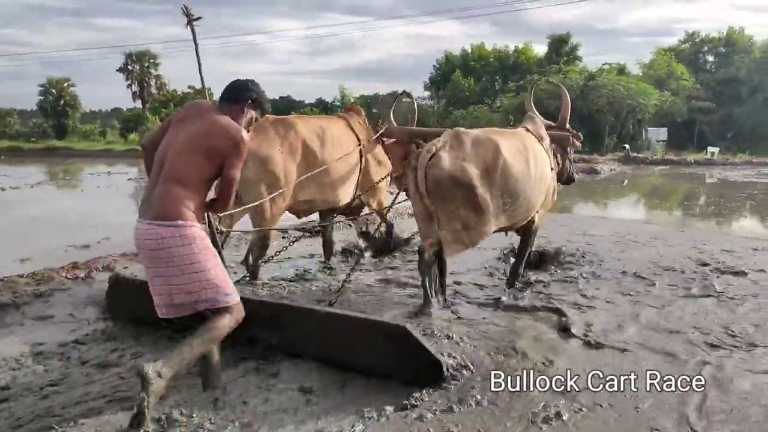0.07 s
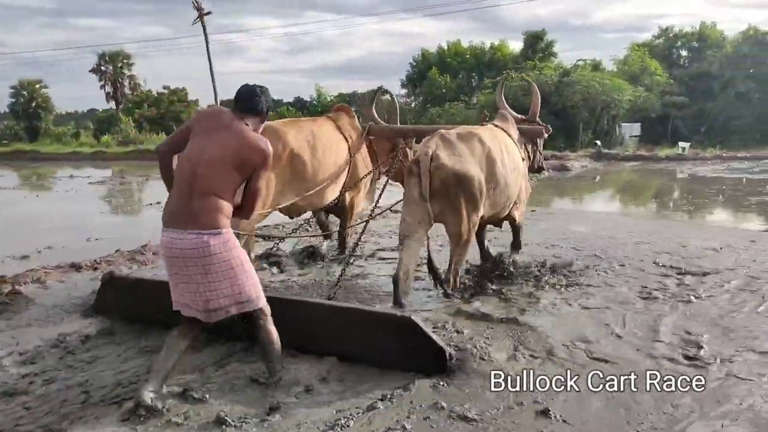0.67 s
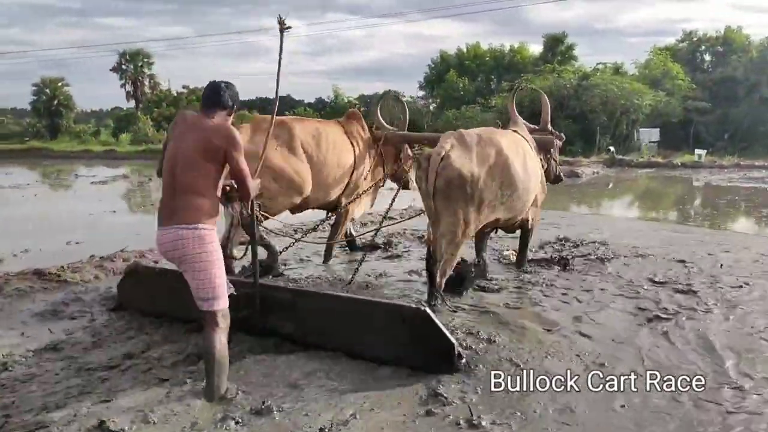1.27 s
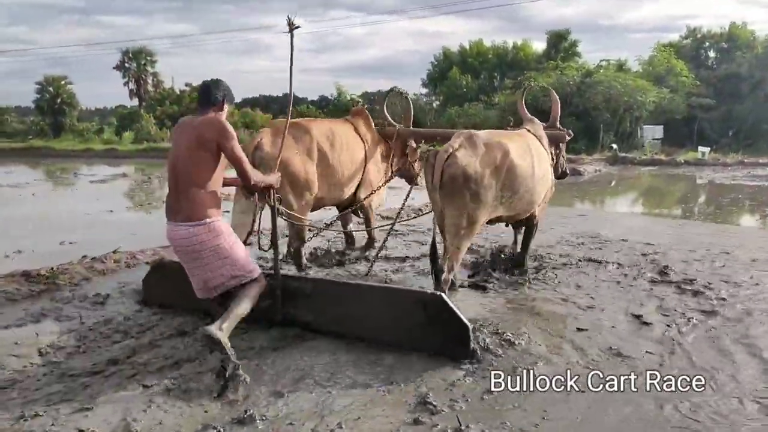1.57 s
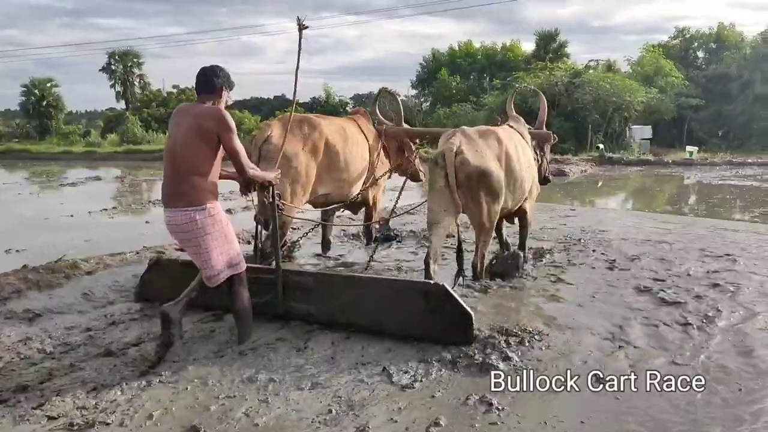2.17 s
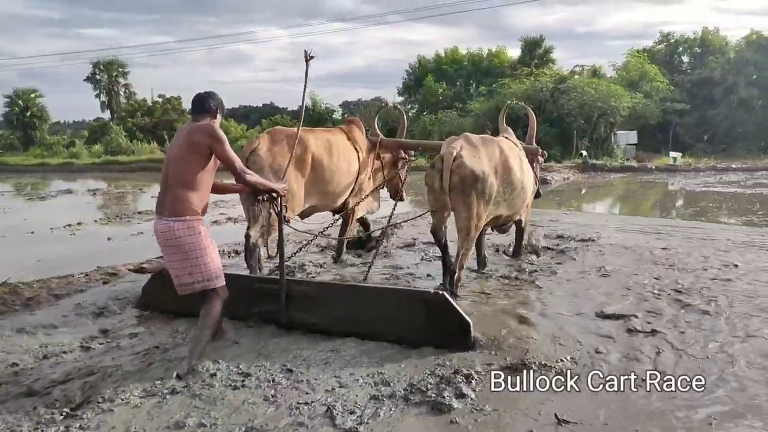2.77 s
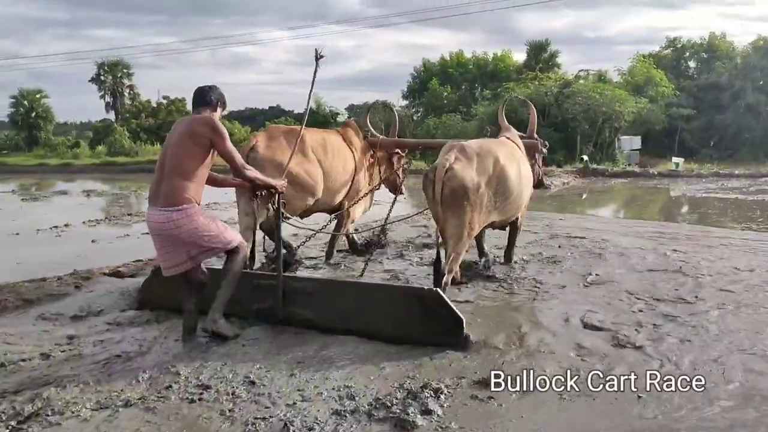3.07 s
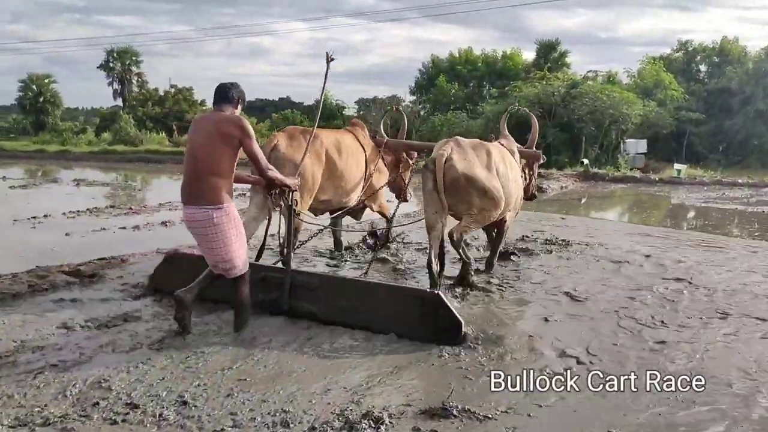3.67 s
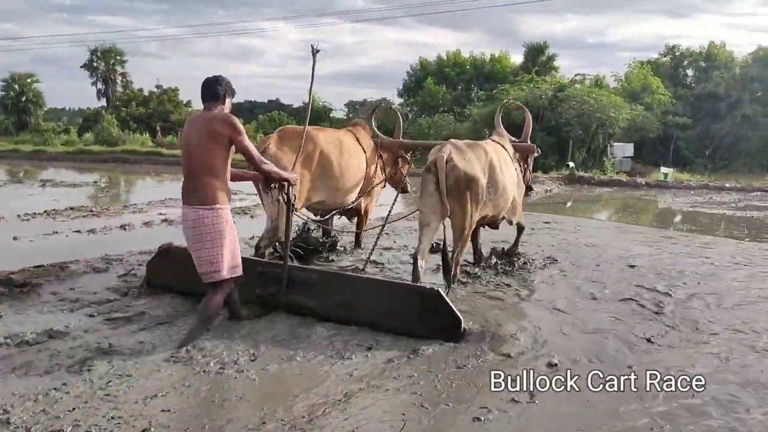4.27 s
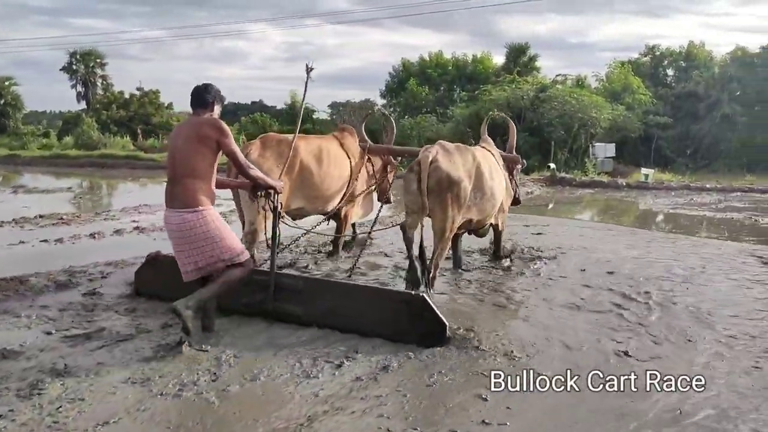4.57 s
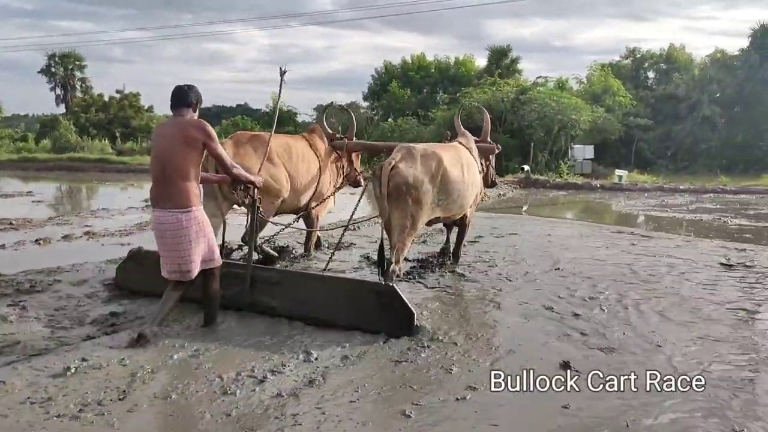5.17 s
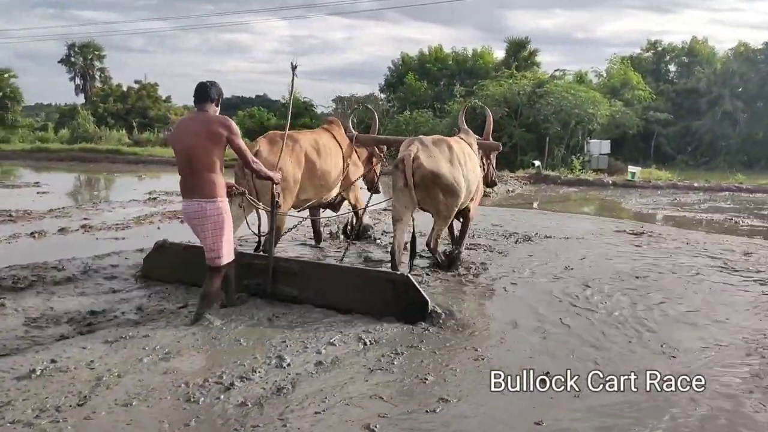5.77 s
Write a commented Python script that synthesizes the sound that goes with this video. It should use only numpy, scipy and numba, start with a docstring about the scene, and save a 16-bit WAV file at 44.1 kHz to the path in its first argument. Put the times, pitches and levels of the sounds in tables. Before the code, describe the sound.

Wet mud and water slosh and squelch as wading bullocks drag a board, with small plops, splats and faint harness clinks.

```python
"""Sloshing, fizzing water is heard first, with a clink of harness: two bullocks wade through a flooded
field, dragging a levelling board, a man walking behind. The board's wave is a sum of many damped bubble
and droplet tones that swells at each step and slowly fades. Air pockets in the mud resonate as plops,
rising gulps and thuds, and thrown mud spatters back in bursts of noise. Metal rings and tiny bells
vibrate when struck. A faint wind rumbles; in the open air there is no echo."""
import sys
import numpy as np
from scipy import signal
from scipy.fft import rfft, irfft, next_fast_len
from scipy.io import wavfile
from numba import njit

SR = 44100
rng = np.random.default_rng(int(sys.argv[2]) if len(sys.argv) > 2 else 0)


def log_audio(samples):
    """Write samples as a 16-bit WAV file to the path given in sys.argv[1]."""
    # one column per channel
    frames = np.atleast_2d(samples).T
    # limit to full scale, then quantise
    limited = np.clip(frames, -1, 1)
    pcm = np.round(limited * 32767).astype(np.int16)
    wavfile.write(sys.argv[1], SR, pcm)


N = 265570
TIME = np.arange(N) / SR

# A hoof or foot sinks in and pulls out. Each row: start in seconds, length in seconds,
# heavy mud level in dB, sloshing water level in dB.
FOOTFALLS = [(0.104, .10, -57.5, -43.5), (0.267, .07, -73.5, -46.5), (0.437, .04, -58.5, -42.5),
             (0.549, .07, -49.5, -44), (0.692, .11, -52, -41), (0.882, .05, -66.5, -43.5),
             (1.144, .09, -64.5, -42.5), (1.399, .10, -51, -42.5), (1.566, .14, -54.5, -43),
             (1.859, .15, -50, -44), (2.117, .18, -57, -46), (2.451, .12, -54.5, -43.5),
             (2.735, .11, -52, -43.5), (2.972, .19, -56.5, -44.5), (3.373, .08, -51, -43.5),
             (3.568, .05, -90, -47.5), (3.776, .08, -66, -47), (3.963, 0.056, -58, -50),
             (4.048, 0.10, -51.5, -47), (4.341, .05, -51, -41), (4.453, .04, -56, -46),
             (4.582, .07, -63, -48.5), (4.786, .10, -61, -49.5), (4.931, .02, -51.5, -47),
             (5.057, .04, -50.5, -43.5), (5.475, .08, -68.5, -49.5), (5.716, .04, -61, -50),
             (5.857, .08, -53.5, -50)]
# A swinging leg throws up spray. Each row: start in seconds, length in seconds, level in dB.
LEG_SWINGS = [(0, .022, -40), (0.391, .08, -41), (0.542, 0.15, -38.5), (0.724, .10, -43.5),
              (.86, .10, -45.5), (1.142, .063, -42.5), (1.407, .12, -43), (1.55, .06, -44.5),
              (1.648, .125, -40.5), (1.821, .1, -40.5), (2.046, .2, -48.5), (2.37, .17, -45.5),
              (2.614, 0.13, -40), (2.942, .13, -45), (3.4, 0.055, -44), (3.599, .07, -47), (3.79, .1, -40),
              (3.9, .07, -46.5), (4.047, .06, -45.5), (4.355, 0.04, -43), (4.442, .12, -49),
              (4.849, .11, -46), (5.089, .03, -44.5), (5.457, 0.044, -42.5), (5.86, .09, -48)]
# Spectral envelopes of water, mud, spray and wind. Each row: frequency in Hz, gain in dB.
SLOSH_SPECTRUM = [(150, -47.5), (300, -33.5), (400, -15.5), (520, -1.5), (670, -1), (850, -6), (1130, 0),
                  (1400, -8.5), (1750, -21.5), (2400, -16), (3200, -39.5)]
MUD_SPECTRUM = [(25, -29), (50, -17), (80, -1.5), (130, -1), (250, 6), (380, 2.5), (600, -23.5)]
SPRAY_SPECTRUM = [(1200, -4), (1900, -4), (2350, -5), (2560, -6), (3000, 2.5), (3600, 3), (4500, 0.5),
                  (5050, 1), (5500, -4.5), (5900, -1.5), (7000, 0), (7600, -3), (8000, -19.5)]
WIND_SPECTRUM = [(20, 4), (50, 4.5), (100, 0.5), (200, -13.5), (400, -32.5)]
# Harness rings knock together. Each row: start in seconds, level in dB, pitch in Hz, length in seconds.
RING_CONTACTS = [(.002, -34.5, 4900, 0.015), (0.022, -32.5, 4860, 0.0052), (0.17, -29.5, 4310, 0.0091),
                 (0.618, -31.5, 4420, 0.016), (0.638, -18.5, 4290, 0.0067), (0.664, -36, 3760, 0.019),
                 (1.902, -36.5, 4480, 0.015), (2.418, -38, 4460, 0.021), (3.18, -31.5, 4290, 0.0096),
                 (3.206, -38, 4300, 0.018), (3.568, -37.5, 4320, 0.018), (5.476, -27, 4320, 0.012),
                 (5.498, -34, 4290, 0.0083), (5.501, -35.5, 4440, 0.036)]
# Large air pockets in the mud. Each row: start in seconds, level in dB, starting pitch in Hz,
# length in seconds, glide over that length in octaves.
AIR_POCKETS = [(0.143, -22, 669, 0.0085, .2), (0.191, -28, 904, 0.0053, 0), (0.202, -23.5, 1100, 0.0091, 0),
               (.205, -24.5, 643, 0.0046, -0.15), (0.258, -33.5, 625, 0.017, .1),
               (0.34, -28.5, 780, 0.0044, -0.21), (0.349, -32.5, 1080, 0.0069, .1),
               (0.442, -25, 822, 0.00077, -0.19), (0.456, -28, 698, 0.012, -0.32),
               (0.4881, -16, 760, .0034, -0.0099), (.497, -29, 755, .004, 0),
               (0.538, -32, 636, 0.011, -0.084), (0.554, -25, 686, 0.01, -0.056),
               (0.575, -26.5, 986, 0.007, 0.064), (.616, -18.5, 791, 0.0045, -.25),
               (0.711, -15.5, 710, 0.003, -0.047), (0.717, -29, 1055, 0.0092, -0.1),
               (.738, -31.5, 640, 0.0086, -0.059), (0.768, -33, 1014, 0.011, -0.31),
               (0.844, -31, 608, 0.0082, .1), (0.855, -29.5, 940, .008, 0.2),
               (0.897, -30.5, 653, 0.0049, -0.22), (0.918, -30, 602, 0.006, -0.27),
               (0.944, -37.5, 745, 0.011, -0.088), (1.055, -26.5, 820, 0.0067, -.25),
               (1.113, -34.5, 940, 0.0089, -0.057), (1.151, -33.5, 518, 0.011, 0),
               (1.185, -24, 611, 0.015, 0.16), (1.205, -31.5, 617, 0.017, 0.22),
               (1.239, -25.5, 590, 0.011, 0.036), (1.29, -35.5, 655, 0.021, 0.4),
               (1.305, -30, 1080, 0.0054, 0.26), (1.41, -31, 642, 0.01, 0.32),
               (1.434, -24.5, 620, 0.0051, 0.15), (1.464, -21.5, 780, 0.0054, 0.094),
               (1.491, -28.5, 1175, 0.0041, 0.18), (1.53, -35, 690, .005, 0),
               (1.566, -33.5, 1160, 0.0051, 0.025), (1.615, -29.5, 600, 0.0064, -0.3),
               (1.649, -32.5, 660, .008, 0.061), (1.669, -32.5, 956, 0.017, 0.1),
               (1.684, -26, 1216, 0.0086, -0.045), (1.733, -36, 1155, .007, 0.16),
               (1.829, -28, 530, 0.0026, -0.31), (1.879, -28, 722, 0.011, 0.04),
               (1.919, -28, 720, .007, 0.034), (1.958, -29, 680, 0.0096, 0.15), (1.946, -33, 660, .008, 0),
               (1.96, -32, 1135, 0.012, 0), (1.973, -30.5, 750, .004, -0.082),
               (1.992, -23.5, 696, 0.0067, 0), (2.0127, -25, 663, 0.0049, 0.0099),
               (2.028, -24.5, 612, 0.0038, -0.094), (2.045, -31, 1326, 0.0035, -0.017),
               (2.048, -30.5, 602, 0.0055, 0.097), (2.067, -30, 1210, 0.0025, 0.097),
               (2.207, -26, 603, .005, 0.24), (2.391, -31, 532, 0.024, 0.29),
               (2.409, -31.5, 1146, 0.007, 0.01), (2.438, -29, 580, 0.0028, 0.039),
               (2.461, -32, 1110, 0.0057, -0.13), (2.519, -30.5, 950, 0.0062, 0.27),
               (2.597, -26, 650, 0.005, -0.23), (2.676, -30, 625, .006, .1),
               (2.679, -27, 1034, 0.005, -0.002), (2.723, -30.5, 550, 0.0051, .1),
               (2.768, -25.5, 698, 0.006, -0.0055), (2.78, -25, 607, 0.0066, -0.3),
               (2.8, -33.5, 1070, 0.0077, -0.15), (2.804, -29.5, 602, 0.0037, .1),
               (2.845, -27, 647, .008, 0.1), (2.859, -31, 520, .005, .2), (2.938, -32.5, 737, .006, 0),
               (2.947, -33.5, 545, .005, -0.04), (3.022, -25, 1030, 0.0025, -0.12),
               (3.083, -32, 880, 0.0062, -0.15), (3.111, -34, 660, .005, .1),
               (3.137, -34, 530, .007, 0.045), (3.184, -29.5, 601, 0.0017, -0.23),
               (3.282, -23.5, 711, 0.0042, -0.14), (3.392, -22.5, 940, 0.005, -0.3),
               (3.434, -32, 746, 0.0044, 0.082), (3.504, -29, 687, 0.0096, -0.4),
               (3.509, -32.5, 1250, 0.0037, 0.016), (3.603, -35.5, 1030, 0.007, -0.073),
               (3.784, -31.5, 628, 0.0045, 0.13), (3.798, -32.5, 1040, 0.0033, 0.16),
               (3.884, -35.5, 667, 0.009, -0.026), (3.97, -28, 498, 0.0041, 0.35),
               (4.011, -32.5, 434, 0.018, 0.4), (4.039, -29.5, 652, .01, -0.29),
               (4.067, -27.5, 642, 0.015, 0.24), (4.085, -26.5, 737, 0.0041, -0.29),
               (4.098, -29.5, 1410, 0.0021, 0.046), (4.16, -37, 1120, 0.0039, -0.069),
               (4.165, -33.5, 612, 0.016, 0.13), (4.343, -31.5, 528, 0.0046, 0.28),
               (4.376, -33, 650, .014, -0.27), (4.4517, -25, 984, 0.005, -0.03),
               (4.541, -38.5, 630, 0.0063, 0.063), (4.593, -39.5, 1100, 0.0046, 0.2),
               (4.611, -31.5, 641, 0.0027, -0.18), (4.808, -31.5, 410, 0.0208, 0.31),
               (4.923, -27.5, 740, 0.0052, -0.033), (4.9547, -23.5, 570, 0.0058, 0.51),
               (4.965, -16.5, 665, 0.0027, 0.025), (4.973, -20, 760, 0.0031, 0.17),
               (5.02, -30, 506, .004, -0.27), (5.0395, -15.5, 858, 0.001, 0.1),
               (5.074, -32, 990, 0.0074, -0.19), (5.131, -34, 800, 0.0099, 0.038),
               (5.227, -37.5, 660, 0.01, 0.5), (5.271, -39.5, 1100, .005, -0.071),
               (5.404, -45, 497, 0.023, 0.048), (5.499, -39, 480, 0.015, -0.058),
               (5.564, -29, 1010, 0.0026, 0), (5.575, -35.5, 1072, 0.012, -0.0017),
               (5.6, -38.5, 653, 0.0099, -0.061), (5.672, -36.5, 677, 0.01, 0.073),
               (5.722, -32.5, 904, 0.0023, -0.26), (5.747, -37, 712, 0.0093, -0.26),
               (5.827, -37, 593, 0.0079, 0.24), (5.884, -32.5, 970, 0.0089, 0.079),
               (5.955, -33, 597, .006, -0.22)]
# Cavities under a hoof pulling free. Each row: start in seconds, level in dB, starting pitch in Hz,
# length in seconds, rise in octaves.
SUCTION_CAVITIES = [(0.145, -30, 744, 0.024, 0.5), (3.972, -37, 594, .014, 0.7),
                    (4.294, -34, 493, 0.02, 0.51), (4.997, -29.5, 543, 0.0071, 1.2),
                    (5.091, -31, 492, 0.028, 1.4), (5.533, -38, 595, .02, 0.24)]
# Large lumps of mud slap the water. Each row: start in seconds, level in dB, band centre in Hz,
# bandwidth in Hz, length in seconds, left minus right in dB.
MUD_LUMPS = [(0.404, -32, 5600, 3800, 0.0077, -1), (0.436, -40, 4850, 4100, 0.0052, -1),
             (0.615, -25, 3430, 900, 0.008, 1.5), (0.622, -29.5, 4700, 3000, 0.0084, -4),
             (1.186, -45, 4600, 3500, 0.0064, 8), (1.203, -32, 4760, 3500, 0.0045, 9.5),
             (1.385, -38.5, 5500, 3500, 0.0058, 4), (1.429, -33, 3840, 3020, 0.012, -1),
             (1.462, -35, 4650, 3500, 0.0033, 6), (1.496, -34, 4330, 1600, 0.0041, 4),
             (1.62, -32, 5040, 3500, .004, 0), (1.646, -34, 4960, 2000, 0.0032, 4),
             (1.715, -34, 4900, 2600, 0.0036, 6), (1.741, -25, 3850, 3000, 0.0011, 9),
             (1.748, -33, 5100, 2000, 0.0053, 9), (1.877, -30.5, 4030, 2600, 0.0039, 6),
             (1.924, -30.5, 4640, 2180, 0.0097, 4), (2.013, -36, 5060, 4100, 0.012, 0.5),
             (2.063, -35, 4600, 3500, 0.0058, 2), (2.212, -35, 3500, 1500, .002, -3),
             (2.274, -26, 3600, 700, 0.0052, 1), (2.28, -32, 3720, 1700, 0.019, 0),
             (2.693, -39, 4930, 3400, 0.013, 4), (2.74, -36, 4870, 3400, .005, 12),
             (2.805, -32, 5750, 3000, 0.0053, 3.5), (3.08, -36.5, 5260, 3500, 0.0033, 6),
             (3.226, -36.5, 5300, 3500, 0.0048, -2), (3.412, -36, 4040, 2000, 0.0024, 4),
             (3.463, -36.5, 6300, 2800, 0.0042, -7), (3.493, -31.5, 3320, 2190, 0.0019, 12),
             (3.837, -41.5, 4430, 3000, 0.0058, 1), (3.846, -25, 4750, 3500, 0.00065, 7),
             (3.853, -46, 4640, 3000, .003, 3), (3.945, -31.5, 5650, 3400, 0.0029, 5),
             (4.059, -30.5, 5140, 3370, 0.0032, -3), (4.074, -27.5, 5370, 2400, 0.0055, -1),
             (4.103, -33, 4500, 3000, 0.0024, 8), (4.111, -33.5, 4900, 4000, 0.0066, 2),
             (4.25, -38, 3710, 1200, 0.0059, 10), (4.55, -37.5, 4620, 3400, 0.0058, -1),
             (4.72, -37, 5200, 3400, 0.0054, 1), (4.759, -38.5, 5500, 3500, 0.0093, -3),
             (4.934, -36.5, 4080, 3400, 0.0043, 4), (5.037, -29.5, 4500, 3380, 0.0056, -1),
             (5.072, -29.5, 3170, 3000, 0.0021, -4), (5.1144, -27, 5640, 3400, 0.0018, 4),
             (5.121, -33.5, 5440, 4300, 0.0018, -4), (5.234, -34, 5460, 3400, 0.0031, -5),
             (5.695, -38, 5000, 3400, .003, -6), (5.722, -37.5, 5200, 3400, 0.0038, 0),
             (5.959, -34.5, 4130, 2600, 0.011, -5)]
# The heaviest hoof falls. Each row: start in seconds, level in dB, pitch in Hz, length in seconds.
HEAVY_HOOF_FALLS = [(0.577, -29.5, 202, 0.0044), (.772, -30.5, 374, .006), (.896, -36.5, 320, .006),
                    (1.058, -36, 356, .005), (1.461, -33, 230, 0.0079), (1.529, -36, 273, 0.011),
                    (1.832, -34, 322, 0.0067), (1.882, -36, 210, .005), (1.923, -29.5, 290, 0.0071),
                    (2.01, -29, 242, 0.0048), (2.043, -35, 145.5, .0084), (2.51, -37, 284, 0.017),
                    (3.059, -32, 343, 0.0056), (3.155, -38.5, 209, 0.0076), (3.283, -38.5, 298, .005),
                    (3.393, -30.5, 174, 0.0071), (3.405, -28.5, 247, 0.0036), (3.434, -31.5, 181.5, 0.0071),
                    (4.26, -33, 316, 0.027), (4.098, -37, 230, .005), (4.392, -41, 222.5, 0.0042),
                    (4.955, -28.5, 381, 0.016), (5.035, -29, 286, .006), (5.081, -26.5, 231, 0.0077),
                    (5.713, -43.5, 285, 0.014)]
# Tiny harness bells are struck. Each row: start in seconds, level in dB, pitch in Hz.
CLAPPER_STRIKES = [(.712, -33, 7330), (.7302, -24, 7316), (1.319, -41, 6960), (1.5056, -41, 7260),
                   (2.387, -41, 7300), (5.1297, -40, 7340), (5.48, -41.5, 7480), (5.8446, -37.5, 7040)]
# Modes of a bell. Each row: multiple of the pitch, level in dB, time to fall 60 dB in seconds.
BELL_PARTIALS = [(1, -2.5, .2), (.981, -3, .085), (1.011, -14, .1), (.912, -12, .1), (.51, -8, .072)]
# How the two microphone ports differ. Each row: frequency in Hz, left minus right in dB,
# phase lead of the left in radians.
PORT_DIFFERENCES = [(60, 8.5, -1.3), (180, 1, 0.48), (500, 0.5, -0.11), (1380, -0.5, -0.43),
                    (1710, -3, 1.17), (2630, 7, 0.023), (3360, 10.5, -1.8), (4140, 7.5, -1.7),
                    (6070, 6, -1.62), (7290, -10.5, -1.1)]


def undb(db):
    """Amplitude grows tenfold for every 20 dB."""
    return 10 ** (np.asarray(db) / 20)


def unit(x):
    """Normalisation to an rms of 1."""
    return x / np.sqrt(np.mean(x ** 2))


def pan(db):
    """Constant-power panning: two gains whose ratio, left over right, is db."""
    return unit(undb(np.array([[db], [-db]]) / 2))


def add(out, start_s, sound):
    """Superposition: a sound adds to those already present."""
    start = max(int(start_s * SR), 0)
    part = sound[..., :max(N - start, 0)]
    out[:, start:start + part.shape[-1]] += part


def response(x, points):
    """Linear filtering: the spectrum is multiplied by a curve through (Hz, dB[, radians]) points."""
    size = next_fast_len(N + 2000)
    log_hz = np.log(np.arange(size // 2 + 1) * SR / size + 1)
    hz, db, *phase = np.transpose(points)
    curve = undb(np.interp(log_hz, np.log(hz), db))
    if phase:
        curve = curve * np.exp(1j * np.interp(log_hz, np.log(hz), phase[0]))
    return irfft(rfft(x, size) * curve, size)[..., :N]


def colour(x, points):
    """Spectral shaping, with the result normalised to an rms of 1."""
    return unit(response(x, points))


def swell(start, length, attack_s, release_s):
    """An envelope of linear rise, hold and exponential decay."""
    rise = np.clip((TIME - start) / attack_s + .5, 0, 1)
    return rise * np.exp(-np.maximum(TIME - start - length, 0) / release_s)


def stirring():
    """Incoherent sources add in power: wave, steps and leg swings set water, mud and spray amplitudes."""
    # The board's wave fades, in dB per second, as the team walks away.
    water_power = undb(-44.5 - 0.85 * TIME) ** 2
    mud_power = undb(-63.5 - 2.1 * TIME) ** 2
    spray_power = undb(-43.5 - 0.56 * TIME) ** 2
    for start, length, mud_db, water_db in FOOTFALLS:
        push = swell(start, length, attack_s=0.01, release_s=0.077)
        mud_power += (undb(mud_db) * push) ** 2
        water_power += (undb(water_db) * push) ** 2
    for start, length, db in LEG_SWINGS:
        spray_power += (undb(db) * swell(start, length, attack_s=0.02, release_s=0.016)) ** 2
    return np.sqrt([water_power, mud_power, spray_power])


@njit
def grains(start, hz, cycles, size, glide, lag, lean):
    """Damped oscillators of rising pitch, each with a time and level difference between channels."""
    out = np.zeros((2, N))
    for k in range(len(start)):
        decay_samples = cycles[k] / hz[k] * SR
        for channel in range(2):
            sign = 1 - 2 * channel
            begin = start[k] * SR + sign * lag[k] * SR / 2
            for i in range(max(int(begin) + 1, 0), min(int(begin + 4 * decay_samples), N)):
                age = (i - begin) / decay_samples
                envelope = np.exp(-age) * min(age * 3, 1.)
                phase = 2 * np.pi * cycles[k] * age * (1 + glide * age / 2)
                out[channel, i] += size[k] * (1 + sign * lean[k]) * envelope * np.sin(phase)
    return out


def cloud(low_hz, high_hz, cycles, glide, scatter_db, lag_s, width, count):
    """Random bubbles or droplets follow a power law, many faint and a few strong; the rms is 1."""
    when, pitch, length, strength, bearing, side = rng.random((count, 6)).T
    hz = low_hz + (high_hz - low_hz) * pitch
    decay_cycles = cycles * 2 ** (2 * length - 1)
    size = np.sqrt(hz) * undb(-scatter_db * np.log(np.maximum(strength, .01)))
    lag, lean = lag_s * (2 * bearing - 1), width * (2 * side - 1)
    return unit(grains(when * N / SR, hz, decay_cycles, size, glide, lag, lean))


def churning(water, mud, spray):
    """Thousands of brief resonances merge into slosh, rumble and fizz around the board and legs."""
    bubbles = cloud(298.9, 2810, cycles=4.27, glide=.061, scatter_db=3, lag_s=12e-5, width=.09,
                    count=11000)
    clods = cloud(24, 593, cycles=1.15, glide=.042, scatter_db=3, lag_s=15e-5, width=.19, count=3000)
    drops = cloud(1310, 4855, cycles=3.87, glide=.017, scatter_db=2.5, lag_s=13e-5, width=.55,
                  count=36000)
    mist = cloud(4710, 8200, cycles=4.5, glide=.02, scatter_db=.5, lag_s=13e-5, width=.38, count=28000)
    mist *= unit(spray) ** 0.054  # water thrown harder breaks into more mist
    # A few droplets trap a tiny bubble, which rings far longer than their impact.
    tinkle = cloud(1800, 7800, cycles=32, glide=.014, scatter_db=3, lag_s=14e-5, width=.59, count=1200)
    fizz = unit(drops + mist) + undb(-8) * tinkle
    return (colour(bubbles, SLOSH_SPECTRUM) * water * undb(1)
            + colour(clods, MUD_SPECTRUM) * mud * undb(1)
            + colour(fizz, SPRAY_SPECTRUM) * spray)


def wind():
    """Light air on each microphone gives uncorrelated low-frequency noise."""
    return colour(rng.standard_normal((2, N)), WIND_SPECTRUM) * undb(-77)


def resonance(hz, length, glide_oct, attack_cycles, tail_db=-40, wobble_oct=0):
    """A heavily damped resonator rings briefly at a pitch that may drift, leaving a faint tail."""
    t = np.arange(int(8 * length * SR)) / SR
    decay = np.exp(-(t / length) ** 2) + undb(tail_db) * np.exp(-t / (2 * length))
    envelope = (1 - np.exp(-(t * hz / attack_cycles) ** 2)) * decay
    cycles = np.arange(int(t[-1] * hz) + 2)
    wobble = wobble_oct * np.interp(t * hz, cycles, rng.standard_normal(len(cycles)))
    pitch_hz = hz * 2 ** (glide_oct * np.minimum(t / length, 1.5) + wobble)
    phase = 2 * np.pi * np.cumsum(pitch_hz) / SR
    return envelope / envelope.max() * np.sin(phase + 2 * np.pi * rng.random())


def burst(hz, width_hz, length):
    """A brief impact spreads its energy over a band: filtered noise with a Gaussian decay."""
    t = np.arange(int((3 * length + .005) * SR)) / SR
    edges_hz = np.clip([hz - width_hz / 2, hz + width_hz / 2], 60, SR / 2.2)
    band = signal.butter(2, edges_hz, "band", fs=SR, output="sos")
    envelope = np.exp(-(t / length) ** 2) * np.minimum(4 * t / length, 1)
    crack = signal.sosfilt(band, rng.standard_normal(len(t)) * envelope)
    return crack * np.sqrt(np.sum(envelope ** 2) / np.sum(crack ** 2))


def metal(modes, rise_s):
    """Struck metal vibrates as a sum of exponentially decaying normal modes."""
    t = np.arange(SR // 4) / SR
    ring = sum(undb(db - 60 * t / t60) * np.sin(2 * np.pi * hz * t) for hz, db, t60 in modes)
    return ring * (1 - np.exp(-t / rise_s))


def harness_rings():
    """Impact and friction excite the rings; the rope soon damps them to a faint lingering tone."""
    out = np.zeros((2, N))
    for start, db, hz, length in RING_CONTACTS:
        gains = undb(db + 2) * pan(0.92)
        add(out, start, gains * resonance(hz, length, glide_oct=0, attack_cycles=6, wobble_oct=0.047))
        add(out, start, gains * undb(-18) * burst(0.61 * hz, 5100, length))  # scrape
        add(out, start, gains * undb(-24) * metal([(hz, 0, .14)], rise_s=.003))
    return out


def scatter(per_s, stir, db, hz, spread_oct, length, spread_db):
    """Event rate and power follow the stirring power. Each row: start in seconds, dB, Hz, seconds."""
    count = int(per_s * N / SR)
    jitter, strength, pitch, size = rng.uniform(-1.1, 1, (count, 4)).T
    work = np.cumsum(stir ** 2)
    work_share = (np.arange(count) + (jitter + 1) / 2) / count
    starts = np.interp(work_share, work / work[-1], TIME)
    level_db = 20 * np.log10(np.interp(starts, TIME, stir)) + db + spread_db * strength
    return list(zip(starts, level_db, hz * 2 ** (spread_oct * pitch), length * 2 ** (size / 2)))


def plops(water):
    """Cavity resonance: an air pocket opens and rings, its pitch sliding as the mud closes in."""
    out = np.zeros((2, N))
    small = scatter(per_s=4, stir=water, db=0.5, hz=658, spread_oct=0.47, length=0.009, spread_db=4)
    small = [(*row, 0.48 * rng.uniform(-1, 1)) for row in small]  # each gets a glide in octaves
    for start, db, hz, length, glide_oct in AIR_POCKETS + small:
        ring = resonance(hz, length, glide_oct, attack_cycles=1.14, tail_db=-15, wobble_oct=0.072)
        # The legs stand to either side, so the ringing reaches one microphone first.
        lag_s = 8e-5 * rng.standard_normal()
        add(out[:1], start + lag_s / 2, undb(db) * ring)
        add(out[1:], start - lag_s / 2, undb(db) * ring)
        add(out, start, undb(db - 16) * burst(850, 1100, length))  # squelch of the walls
        add(out, start + 0.00078, undb(db - 32) * burst(2800, 4500, 0.0023))  # wet smack on opening
    return out


def gulps(close_s=0.004):
    """Suction narrows the cavity under a hoof, so its resonance swells and climbs until it snaps open."""
    out = np.zeros((2, N))
    for start, db, hz, length, rise_oct in SUCTION_CAVITIES:
        t = np.arange(int(length * SR)) / SR
        envelope = np.sqrt(t / length) * np.minimum((length - t) / close_s, 1)
        pitch_hz = hz * 2 ** (rise_oct * (t / length) ** 2)
        add(out, start, undb(db) * envelope * np.sin(2 * np.pi * np.cumsum(pitch_hz) / SR))
    return out


def splats(spray, small_width_hz=3400, small_pan_db=6):
    """Impact noise: a lump's slap is coherent in both channels, its scattered droplets are not."""
    out = np.zeros((2, N))
    small = scatter(per_s=3, stir=spray, db=-2, hz=4500, spread_oct=0.68, length=0.0093, spread_db=4.5)
    small = [(start, db, hz, small_width_hz, length, small_pan_db) for start, db, hz, length in small]
    for start, db, hz, width_hz, length, pan_db in MUD_LUMPS + small:
        slap, left, right = (burst(hz, width_hz, length) for _ in range(3))
        droplets = undb(-6) * np.array([left, right])
        add(out, start, undb(db) * pan(pan_db) * (slap + droplets))
    return out


def thuds():
    """Larger cavities resonate lower: those under a sinking hoof die within a few cycles."""
    out = np.zeros((2, N))
    for start, db, hz, length in HEAVY_HOOF_FALLS:
        add(out, start, undb(db - 1) * resonance(hz, length, glide_oct=0.083, attack_cycles=0.97))
    return out


def harness_bells():
    """A clapper's impulse excites inharmonic modes, the closest of which beat together."""
    out = np.zeros((2, N))
    for start, db, hz in CLAPPER_STRIKES:
        modes = [(hz * ratio, mode_db, t60) for ratio, mode_db, t60 in BELL_PARTIALS]
        add(out, start, undb(db) * pan(1.1) * metal(modes, rise_s=0.00055))
        add(out, start, undb(db - 13) * burst(6000, 3600, 0.0036))  # tick of the clapper
    return out


def scene():
    """In a free field the direct sounds add, with no reflections."""
    water, mud, spray = stirring()
    return (churning(water, mud, spray) + wind() + thuds() + harness_rings() + harness_bells()
            + plops(water) + gulps() + splats(spray))


def record(dry, cutoff_hz=7800):
    """Frequency response: the two ports differ in gain and phase, and a steep low-pass cuts the top."""
    ports = np.array(PORT_DIFFERENCES)
    left = response(dry[0], ports * [1, .5, .5])
    right = response(dry[1], ports * [1, -.5, -.5])
    fade_out = np.minimum((TIME[-1] - TIME) / .004, 1)
    low_pass = signal.ellip(10, .2, 75, cutoff_hz, fs=SR, output="sos")
    return signal.sosfilt(low_pass, np.array([left, right]) * fade_out)


dry = scene()
out = record(dry)
log_audio(out)
```